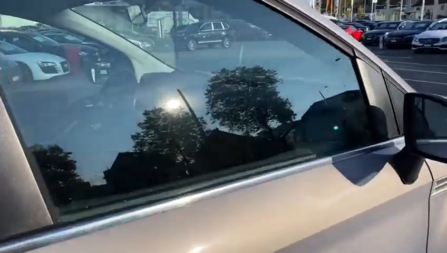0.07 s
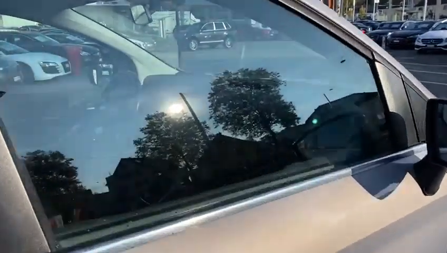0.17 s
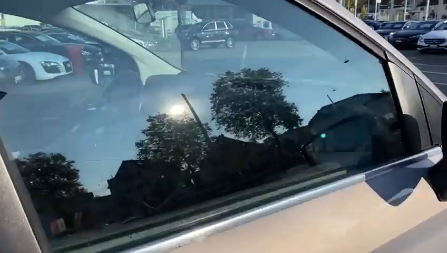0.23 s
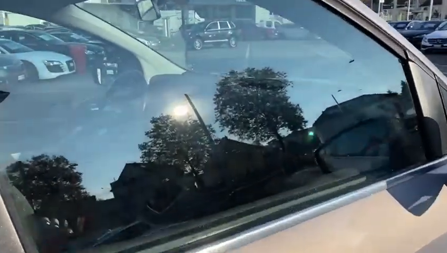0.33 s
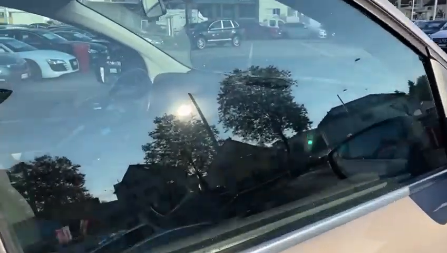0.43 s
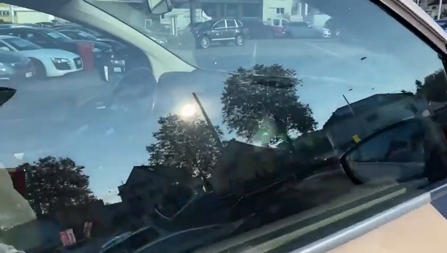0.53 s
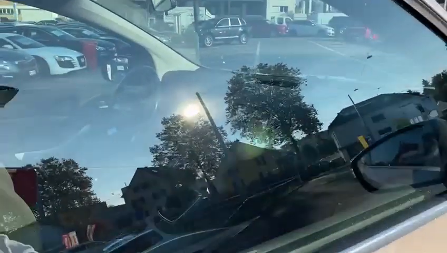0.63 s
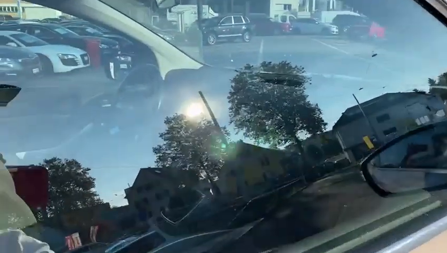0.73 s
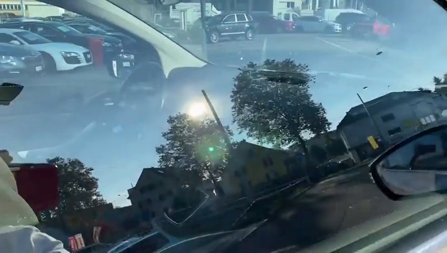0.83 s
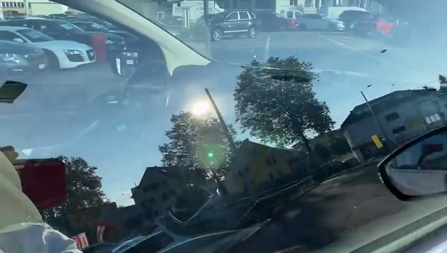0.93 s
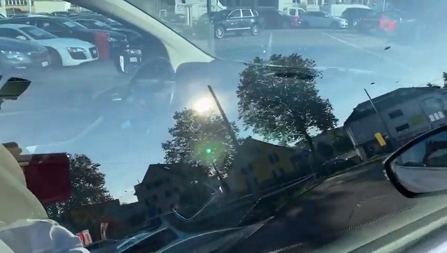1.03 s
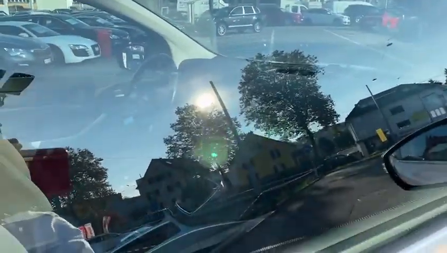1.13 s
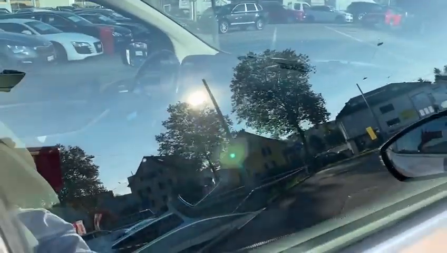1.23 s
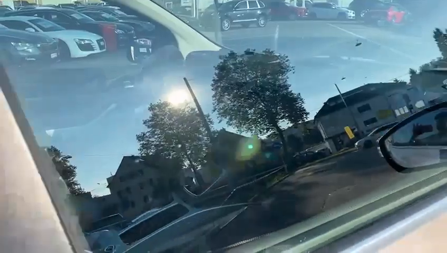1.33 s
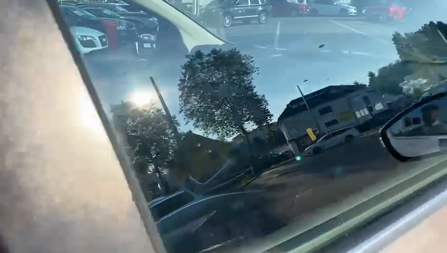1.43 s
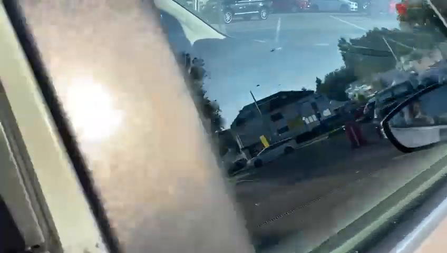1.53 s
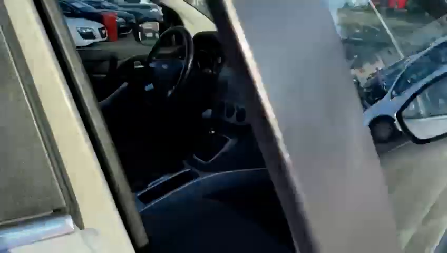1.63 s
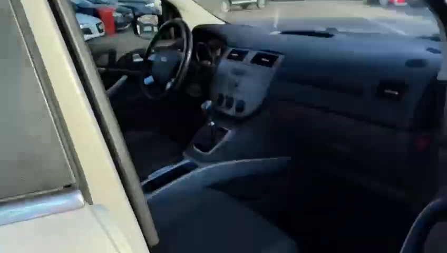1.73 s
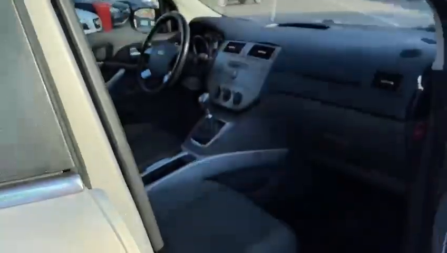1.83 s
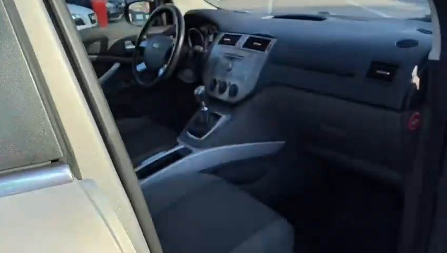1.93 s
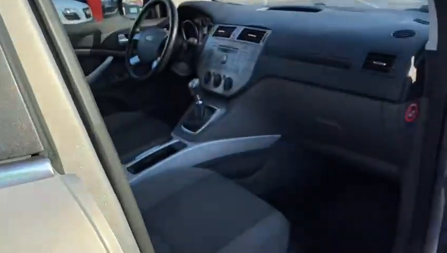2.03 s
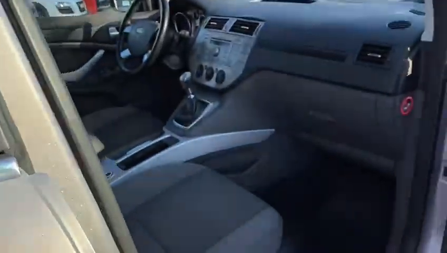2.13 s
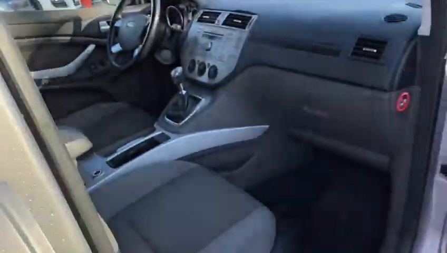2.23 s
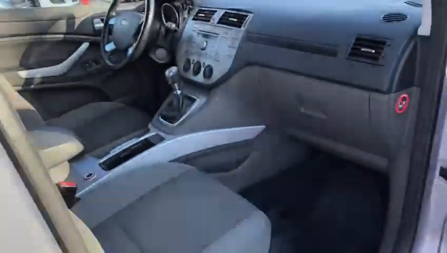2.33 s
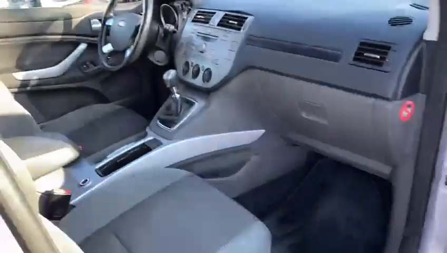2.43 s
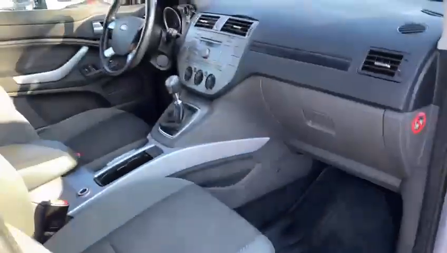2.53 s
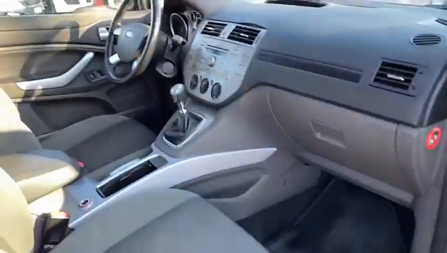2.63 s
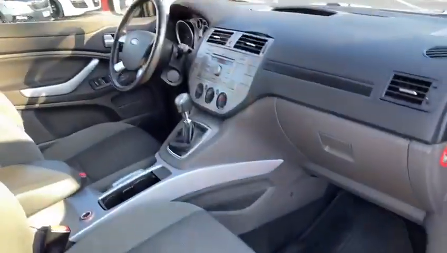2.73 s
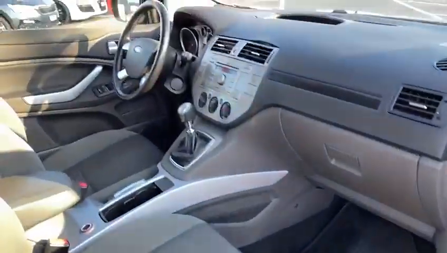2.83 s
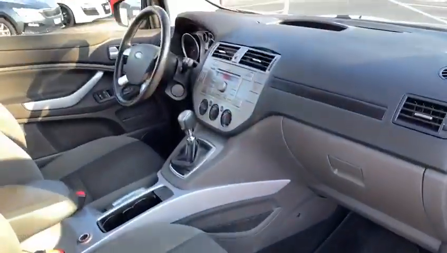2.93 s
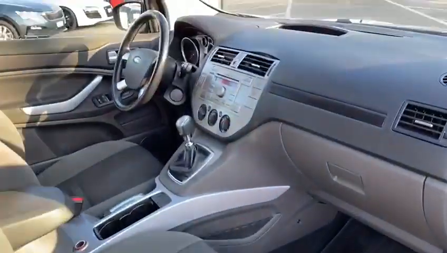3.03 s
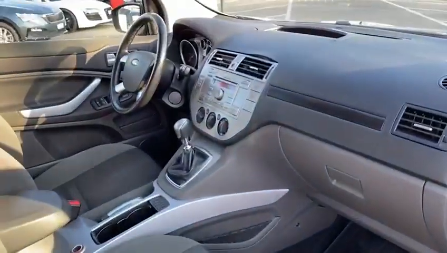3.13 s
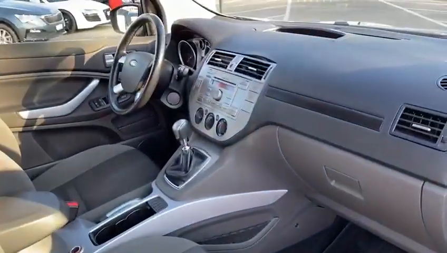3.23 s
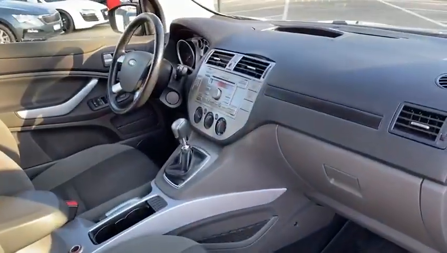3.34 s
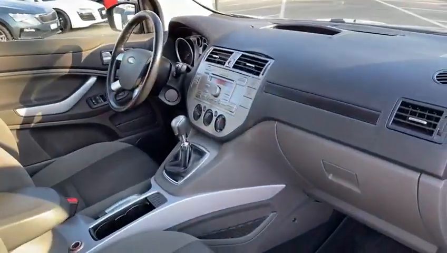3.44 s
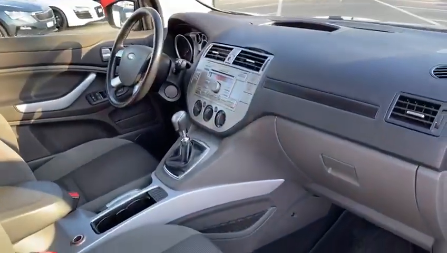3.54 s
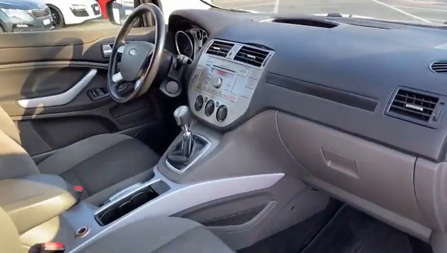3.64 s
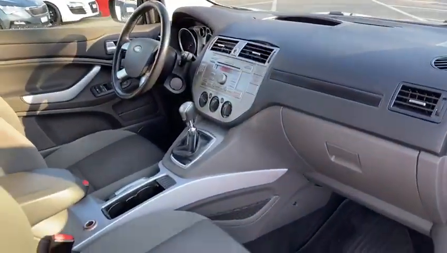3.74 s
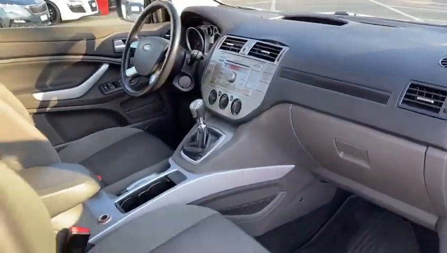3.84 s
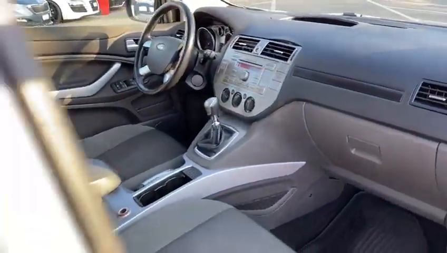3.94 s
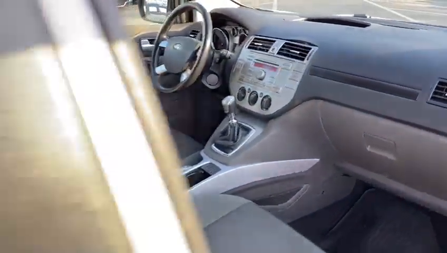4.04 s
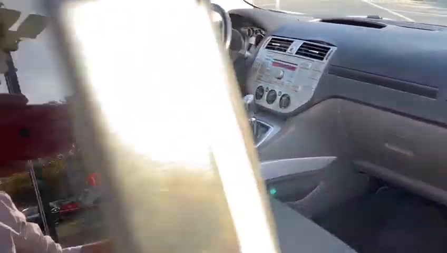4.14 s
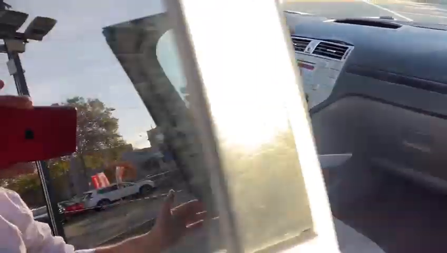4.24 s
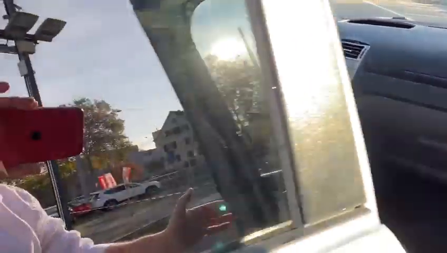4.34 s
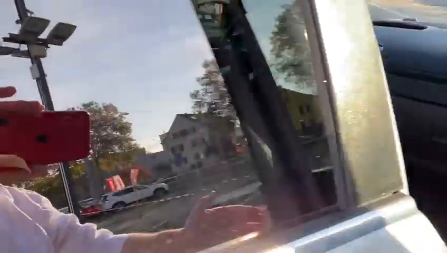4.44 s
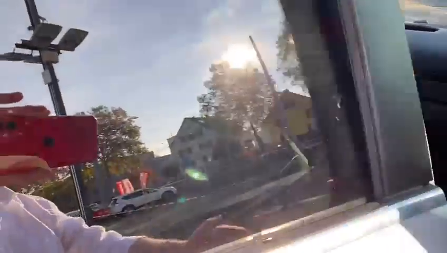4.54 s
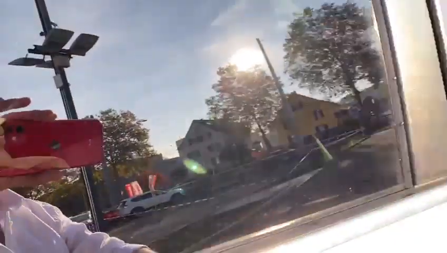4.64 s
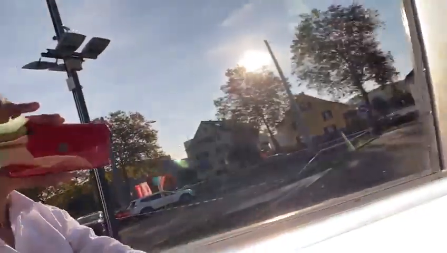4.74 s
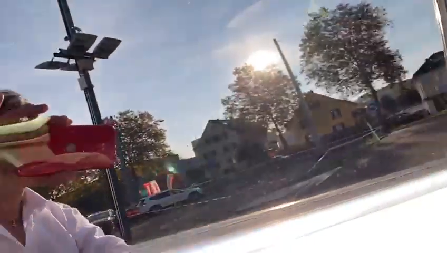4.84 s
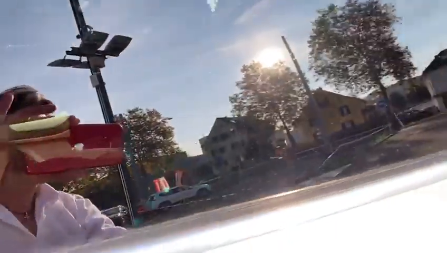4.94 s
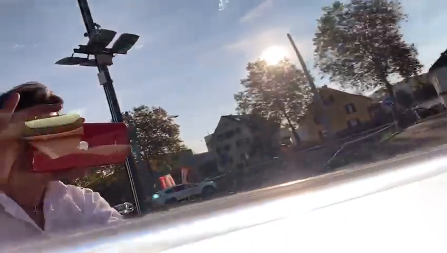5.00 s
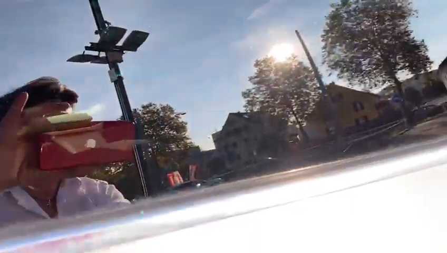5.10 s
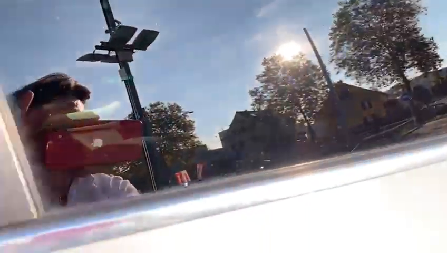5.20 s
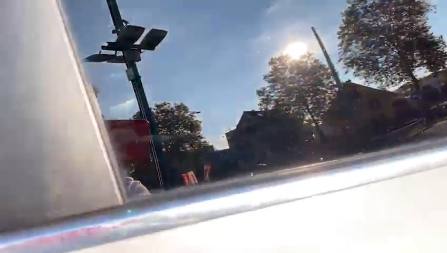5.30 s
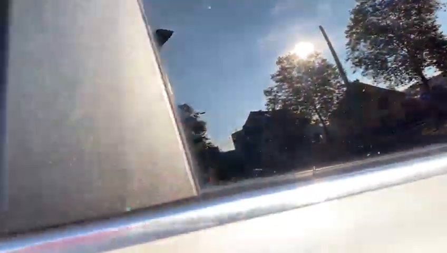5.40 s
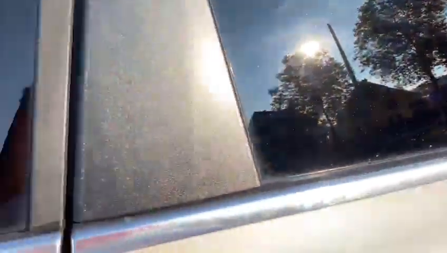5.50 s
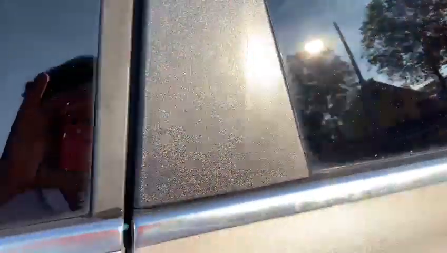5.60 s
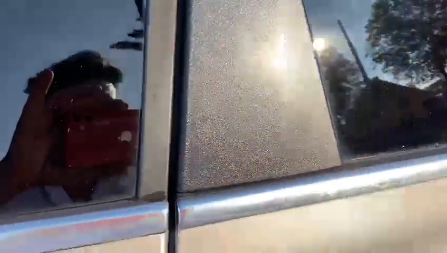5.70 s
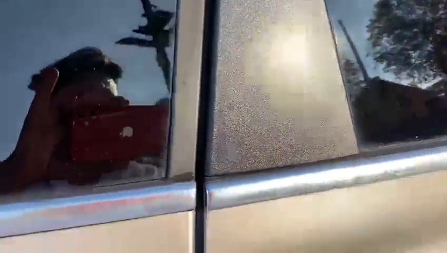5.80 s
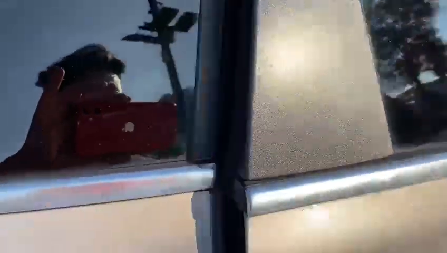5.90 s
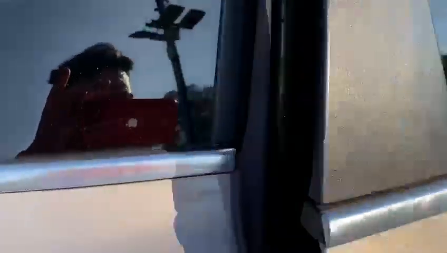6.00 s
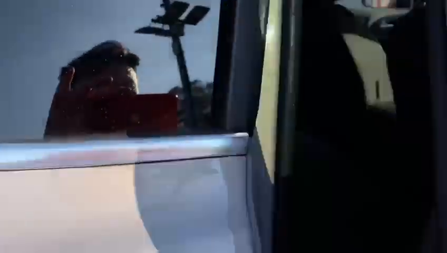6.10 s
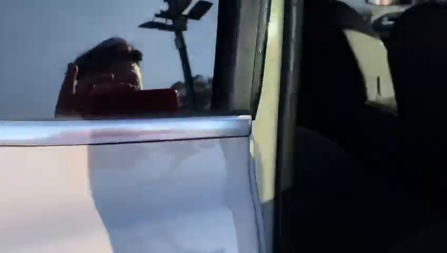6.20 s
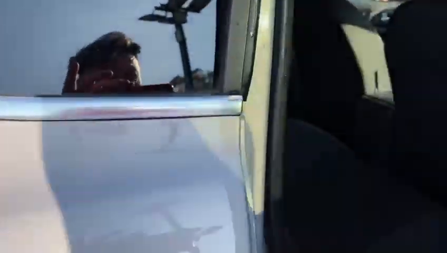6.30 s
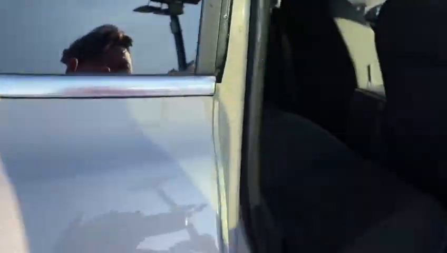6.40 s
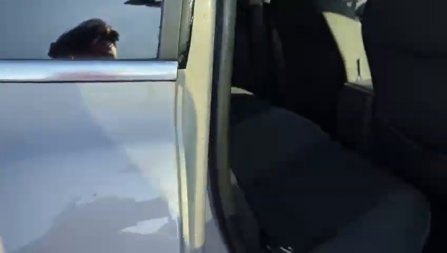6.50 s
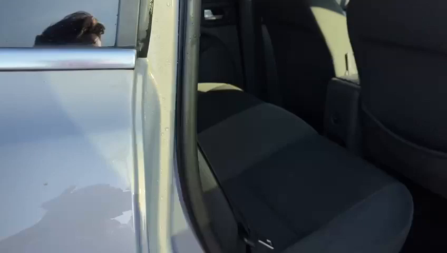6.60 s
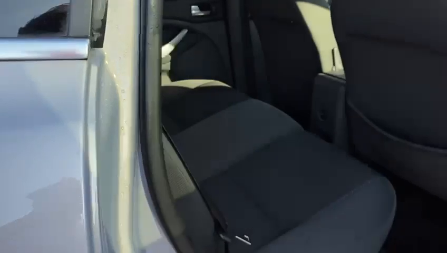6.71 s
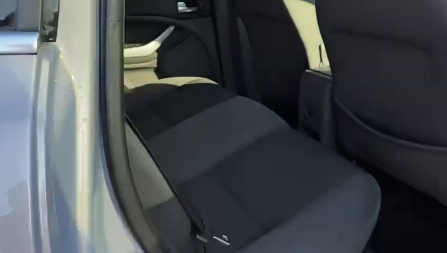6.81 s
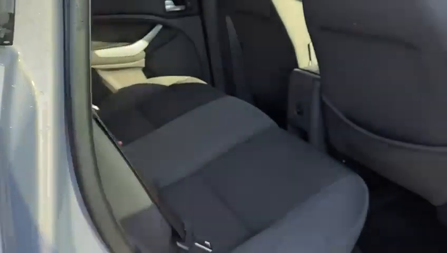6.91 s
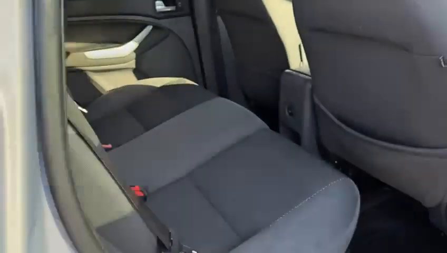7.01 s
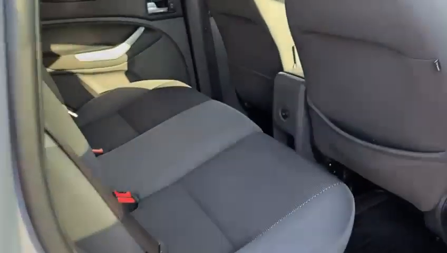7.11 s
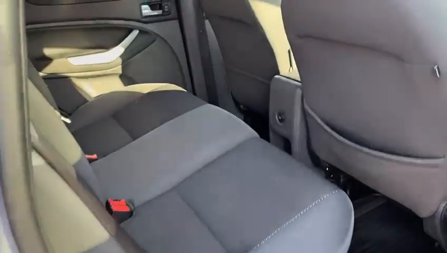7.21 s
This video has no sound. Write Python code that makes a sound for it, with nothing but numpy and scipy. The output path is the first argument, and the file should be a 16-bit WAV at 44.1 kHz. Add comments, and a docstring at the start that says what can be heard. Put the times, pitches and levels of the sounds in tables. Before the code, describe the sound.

A car's front door clicks open and slams with a hollow boom, then the rear door unlatches, over a distant engine rumble and traffic.

```python
"""A car park, close beside a car, on the stereo microphone of a hand-held camera. An engine rumbles
and traffic washes in the distance throughout. First, handle and latch knock on the hollow front door
and its hinge sings faintly. Steps thump, clothes rustle and tick, far cars swell and fade. At 4.6 s
the door slams, bounces on its rubber and makes the cabin boom. Last, from 5.7 s, the rear door opens."""
import sys
import numpy as np
from scipy import signal
from scipy.fft import rfft, irfft, next_fast_len
from scipy.io import wavfile
from scipy.ndimage import uniform_filter1d, map_coordinates

SR = 44100
rng = np.random.default_rng(int(sys.argv[2]) if len(sys.argv) > 2 else 0)


def waveform_to_disk(signal):
    """Save audio, clipped to [-1, 1], as 16-bit WAV at the path in sys.argv[1]."""
    frames = np.transpose(np.atleast_2d(signal))
    scaled = np.clip(frames, -1, 1) * 32767
    samples = np.round(scaled).astype(np.int16)
    wavfile.write(sys.argv[1], SR, samples)


N = 319989

# Resonances of each struck part. Each row: pitch in Hz, width in Hz, dB over the plain contact.
FRONT_HANDLE = [(125.9, 120, 4), (229.2, 28, 9.5), (627, 56, 8), (1850, 130, 3), (4900, 410, 3)]
FRONT_LATCH = [(136, 10, -5), (235, 47, -1.5), (445, 6.8, 11.5), (566, 14, 7), (785, 17, 9),
               (945.5, 28, 15.5), (1374, 74, 9), (1956, 90, 15.5), (3940, 130, -24), (7100, 48, 5)]
FRONT_FRAME = [(131.8, 16, 6), (186, 27, 5.2), (228, 83, 8.2), (367, 10, 5), (489.6, 20, 10.4),
               (566, 16, 14), (650, 81, 9.9), (910, 16, 2.3), (923, 16, 2.7), (1046, 17, 5.6),
               (1156, 47, 6.8), (1247, 14, 10), (1425, 45, 20), (1563, 180, 21), (1930, 96, 19),
               (2760, 120, 15), (2870, 75, 18), (3214, 140, 8), (3570, 89, 11), (3940, 440, 13),
               (4530, 100, 8), (4950, 50, 16), (5350, 90, 14), (7070, 440, 4.6), (7670, 280, 5)]
REAR_HANDLE = [(141.6, 126, 15.4), (238, 18, 11.5), (368, 9, 8.3), (434, 42, 8.5), (491, 22, 11),
               (650, 69, 11), (798, 58, 13), (1025, 18, 5.2), (1137, 120, 11), (1520, 92, 20.4),
               (1640, 130, 15), (1870, 110, 11), (2100, 110, 9), (4130, 40, 1), (7140, 390, 6)]
REAR_LATCH = [(207, 42, 12), (237, 26, 12.4), (300, 20, 5.8), (507.5, 77, 6.1), (617, 89, 7), (868, 11, 1),
              (1160, 41, 5.1), (1409, 92, 17), (2390, 120, 6.1), (2910, 190, 14), (3220, 60, 11),
              (3400, 75, 8.6)]
# The part being struck. Each row: start in seconds, resonances, boom in dB against the push,
# lead of the right microphone port in ms, leftward lean of the treble in dB.
PARTS = [(0, FRONT_LATCH, 4.5, -0.015, 0), (0.6, FRONT_HANDLE, 2, -0.26, 2.5),
         (1.5, FRONT_LATCH, -7.5, 0.4, 1), (4.4, FRONT_FRAME, 3.5, 0.22, 1),
         (5.5, REAR_HANDLE, 2, -0.24, 1.5), (6.2, REAR_LATCH, -1, 0.43, 0.5)]
# The door's registers: boom, push, knock, metal edge, snap. Each row: low and high limit in Hz,
# base t60 in seconds, after-ring in dB, its t60 in seconds.
REGISTERS = [(73, 176, 0.083, -10.5, 0.25), (157.5, 400, 0.18, -12.5, 0.31),
             (419, 1016, 0.073, -11.5, 0.17), (1165, 2300, 0.062, -2.5, 0.091),
             (2870, 19000, 0.11, -24, 0.38)]
# Handle, latch and seal strike the door. Each row: start in seconds, levels of push, knock,
# metal edge and snap in dB, rise in ms, factor on the base t60.
BLOWS = [(0.417, -42, -40.5, -46.5, -53.5, 0.96, 0.93), (0.679, -47, -48.5, -57, -59, 0.49, .3),
         (0.6845, -44.5, -42.5, -57, -54, 0.089, 0.26), (1.075, -31.5, -40.5, -53, -59, 3.5, 0.32),
         (1.105, -26, -36.5, -46, -57, 2.5, 0.41), (1.116, -24, -38.5, -54, -54.5, 1.6, 0.37),
         (1.864, -33, -35, -42, -47, 1.7, 0.64), (1.8765, -23, -19.5, -31, -39.5, 0.58, 0.45),
         (1.888, -22, -26.5, -59, -62, 2, 1), (1.972, -31, -49, -61, -57, 2.7, .5),
         (4.604, -26.5, -48, -40, -52, 3.6, 0.33), (4.6108, -21.5, -16.5, -19.5, -28, 0.74, 0.61),
         (4.618, -18.5, -16, -20.5, -23, 0.16, 0.16), (4.621, -14.5, -27.5, -32.5, -44, 0.51, 0.36),
         (4.6485, -14.5, -24, -30, -33, 0.5, 0.52), (4.662, -27, -26.5, -35, -45, 1.2, 0.41),
         (4.685, -30, -34, -42, -52, 0.91, 0.26), (5.756, -17, -20.5, -40, -53, 0.25, 0.66),
         (5.763, -28, -21, -30.5, -52, 0.36, 1), (5.793, -28, -41, -41.5, -54, 1.6, 0.96),
         (5.8125, -43, -32, -42, -51, 0.49, 0.5), (5.8415, -30.5, -32, -36.5, -71, 0.23, 0.97),
         (6.433, -24, -39, -43, -56, 7.8, 0.94), (6.45, -24, -23.5, -30.5, -40, 2.2, 0.43),
         (6.462, -15.5, -21.5, -35, -49, 4.5, 0.33)]
def doors(near_port_db_per_ms=9, head_start_cycles=0.35):
    """Close by, each blow is a burst of tiny contacts that leaves the hollow panels ringing."""
    out, t = np.zeros((2, N)), np.arange(2 ** 13 + 2 ** 12) / SR
    for s, push_db, knock_db, edge_db, snap_db, rise_ms, ring in BLOWS + bounces():
        since, resonances, boom_db, lead_ms, treble_left_db = [p for p in PARTS if p[0] <= s][-1]
        levels_db = [push_db + boom_db, push_db, knock_db, edge_db, snap_db]
        contacts = port_noise(len(t) + RUN_IN, lead_ms)
        panel = door_body(contacts, resonances, s - since, lead_ms)[:, RUN_IN:]
        panel *= 1 - np.exp(-t * 1000 / max(rise_ms, .1))
        # the port that hears the blow first hears its mids louder
        leans_db = [0, -near_port_db_per_ms * lead_ms / 2, treble_left_db]
        for db, (low_hz, high_hz, t60, after_db, after_t60) in zip(levels_db, REGISTERS):
            fade = np.hypot(amp(-60 * t / (t60 * ring)), amp(after_db - 60 * t / after_t60))
            sound = band(panel * fade, low_hz, high_hz)
            sound *= np.sqrt(.02 * SR / np.sum(sound ** 2, axis=1, keepdims=True))  # as 20 ms at rms 1
            left_db = np.interp(low_hz, [0, 450, 1100], leans_db)
            add(out, s - head_start_cycles / high_hz, amp(db) * lean(sound, left_db))
    return out

RUN_IN = 2 ** 11  # samples in which the resonances build up before a blow
def door_body(contacts, resonances, age_s, lead_ms, dull_hz=5700, ring_cycles=130, pure_hz=60):
    """Narrow resonances ring as tones, wide ones rattle, high ones die first; trim soaks up the top."""
    t, out = (np.arange(contacts.shape[-1]) - RUN_IN) / SR, contacts
    at_ports = age_s + t + np.array([[0], [lead_ms / 1000]])
    for hz, width, db in resonances:
        purity = 1 / (1 + (width / pure_hz) ** 2)
        tone = np.sqrt(2 * np.pi * width / SR) * np.sin(2 * np.pi * hz * at_ports)
        rattle = resonate(contacts, hz, hz / width)
        fade = np.exp(-np.maximum(t, 0) * hz / ring_cycles)
        out = out + amp(db) * fade * (np.sqrt(purity) * tone + np.sqrt(1 - purity) * rattle)
    return signal.lfilter(*signal.butter(2, dull_hz, fs=SR), out)

# The door shudders after a hard blow. Each row: first bounce in seconds, its push in dB.
SHUDDERS = [(1.142, -33), (1.926, -28.5), (4.687, -22.5), (5.794, -47), (6.492, -21)]
def bounces(gap_s=0.025, loss_db=7.5, knock_db=-31, edge_db=-56, snap_db=-46.5, rise_ms=5.1, ring=0.49):
    """The door bounces twice on its soft rubber, the second time more weakly; gives rows like BLOWS."""
    pushes = [(s + k * gap_s, db - k * loss_db) for s, db in SHUDDERS for k in range(2)]
    return [(s, db, db + knock_db, db + edge_db, db + snap_db, rise_ms, ring) for s, db in pushes]

SLAM_S = 4.622
# Modes of the shut cabin and the big panels. Each row: pitch in Hz, level in dB, t60 in seconds.
CABIN_MODES = [(55.4, -2.5, 0.46), (132.4, -6, 0.14), (374, -32, 0.13), (444, -7, 0.056)]
def cabin_boom(swell_cycles=2.2):
    """Heard from just outside: the closing seal squeezes the cabin air, whose modes swell and ring."""
    out, t = np.zeros((2, N)), np.arange(SR) / SR
    for hz, db, t60 in CABIN_MODES:
        swell = 1 - np.exp(-(t * hz / swell_cycles) ** 2)
        add(out, SLAM_S, amp(db - 60 * t / t60) * swell * np.sin(2 * np.pi * hz * t))
    return out

# Steps, a door against its latch and seal, hands on the door and the camera.
# Each row: time in seconds, knock level in dB, knock pitch in Hz, thud level in dB.
BUMPS = [(0.19, -56, 61, -26), (1.1245, -19, 200, -41), (1.153, -17, 128, -36), (1.182, -17, 121, -31),
         (1.223, -22, 140, -35), (1.238, -27, 131, -31), (2.049, -37, 65.5, -27.5), (2.192, -30, 80, -29),
         (2.519, -37, 120, -20), (4.0677, -12, 305, -45), (4.081, -26, 131, -26), (4.7035, -11, 140, -28),
         (4.818, -19.5, 110, -34), (4.882, -13.5, 203, -20.5), (4.927, -20, 260, -22),
         (4.945, -27, 68.3, -12.5), (4.9755, -28, 595, -35), (4.9783, -6.5, 310, -15),
         (4.987, -8.5, 147, -29), (4.991, -22, 403, -41), (5.003, -22, 190, -29), (5.141, -25, 194, -37),
         (5.239, -27, 227, -26.5), (5.413, -22.5, 97, -24.5), (5.442, -16.5, 100, -26),
         (5.706, -17.5, 680, -41), (5.7576, -7.5, 367, -35), (5.7634, -19, 300, -22),
         (5.774, -12, 330, -33), (6.469, -18.5, 246, -20), (6.691, -31, 174, -25)]
def bumps(knock_cycles=0.62, thud_cycles=1.3, tail_db=-24, tail_t60=0.42):
    """A soft contact nearby gives one rounded push, a few cycles of thud and a faint dull tail."""
    out, t = np.zeros((2, N)), (np.arange(2 ** 14) - 2 ** 10) / SR
    after = np.maximum(t, 0)
    for s, knock_db, knock_hz, thud_db in BUMPS:
        knock = -np.cos(2 * np.pi * knock_hz * t) * np.exp(-(t * knock_hz / knock_cycles) ** 2)
        thud_hz = 69.1 * (knock_hz / 100) ** 0.51  # a sharper knock has a higher thud
        onset = 1 - np.exp(-(np.pi * thud_hz * after) ** 2)
        thud = np.sin(2 * np.pi * thud_hz * after) * onset * np.exp(-after * thud_hz / (2 * thud_cycles))
        tail = unit(band(port_noise(len(t)), knock_hz / 2, knock_hz * 0.96))
        tail *= onset * amp(tail_db - 60 * after / tail_t60)
        add(out, s + t[0], amp(knock_db) * (knock + tail) + amp(thud_db) * thud)
    return out

# Spectrum of a small hard contact. Each row: frequency in Hz, gain in dB.
TICK_COLOUR = [(300, 5), (900, 20), (2200, 9), (4500, 0.5), (7000, -8), (9000, 2), (11000, -2.5),
               (13000, -24)]
# Keys, zip and grit. Each row: start in seconds, relative level in dB, ping in Hz.
TICKS = [(0.378, -41, 5640), (0.6847, -34.5, 4950), (1.074, -38, 5270), (1.1198, -34.5, 7200),
         (1.136, -32, 7200), (1.1434, -49, 10500), (1.975, -46, 4800), (2.397, -50, 7060),
         (2.8352, -44.5, 7000), (4.066, -36, 6600), (4.273, -41, 5460), (4.791, -37.5, 6600),
         (5.17, -50, 6400), (5.702, -38, 6300), (5.791, -49, 7400), (6.414, -48, 7000), (6.787, -44, 4500)]
def ticks(level_db=-6, rise_s=0.00029, decay_s=0.0059, tail_db=-19, tail_s=0.036, ping_db=11):
    """Hard little contacts just left of the microphone, each with a broad ping and hardly any ring."""
    out, t = np.zeros((2, N)), np.arange(2 ** 12) / SR
    fade = (1 - np.exp(-t / rise_s)) * (np.exp(-t / decay_s) + amp(tail_db) * np.exp(-t / tail_s))
    for s, db, ping_hz in TICKS:
        contact = colour(port_noise(len(t)), TICK_COLOUR)
        ping = amp(ping_db) * resonate(contact, ping_hz, q=5)
        add(out, s, amp(db + level_db) * unit(contact + ping) * fade)
    return lean(out, left_db=2)

# Soles, sleeves, handles and seals. Each row: start and end in seconds, level in dB,
# resonance in Hz, fizz and resonance in dB against the rasp, build-up in dB.
SCUFFS = [(0.376, 0.46, -48.5, 2260, -21, -20, -7), (0.391, 0.445, -44, 2780, -25, -7, -10),
          (1.039, 1.175, -47, 1730, -12, -15, -8), (1.332, 1.56, -54, 1790, -37, 0, 0),
          (1.393, 1.506, -40.5, 392, -21.5, 0, 0), (1.822, 1.878, -53, 3000, -6, -12, 6),
          (1.958, 2.227, -49, 2450, -9, -7.5, -6), (2.016, 2.203, -49, 1560, -14.5, 7, 2),
          (2.512, 2.613, -64.5, 2500, -5, -12, -11), (4.077, 4.353, -58, 1830, -12, -22, -19),
          (4.565, 4.607, -44, 1350, -15.5, 3.5, 16.5), (5.16, 5.251, -48.5, 2150, -7.5, -19, -3),
          (5.656, 5.792, -38, 764, -15, -6, -1), (6.4, 6.455, -52.5, 1840, -2.5, -13, 21),
          (6.68, 6.827, -54.5, 2320, -17, -1, -4)]
def scuffs(grain_db=2.0, size=2 ** 14):
    """Sliding contact at close range: clumps of tiny slips rasp, with a soft resonance and fizz above."""
    out = np.zeros((2, N))
    for start, end, db, hz, fizz_db, ring_db, build_db in SCUFFS:
        slips = port_noise(size)
        clumps = unit(uniform_filter1d(rng.standard_normal(size), size=90))
        slips *= amp(grain_db * clumps)
        rasp = unit(band(slips, hz / 14, hz * 1.24, order=2))
        ring = amp(ring_db) * unit(resonate(rasp, hz, q=7))
        fizz = amp(fizz_db) * unit(band(slips, 2300, 7600, order=2))
        length = int((end - start) * SR)
        swell = amp(db + build_db * np.linspace(-.5, .5, length)) * signal.windows.tukey(length, .5)
        add(out, start, swell * unit(rasp + ring + fizz)[:, :length])
    return lean(out, left_db=1)

# Hinge and door stay sing faintly. Each row: start and end in seconds, pitch in Hz, level in dB.
HINGE_RUBS = [(1.2, 1.524, 4180, -68), (1.301, 1.52, 1230, -60), (1.282, 1.553, 895, -54.5),
              (1.997, 2.204, 346, -49.5), (2.03, 2.174, 2800, -61), (5.858, 6.35, 258, -47.5),
              (5.88, 6.248, 842, -61), (5.897, 6.3, 1930, -65)]
def hinges(width_ratio=1.005, sag=0.0184):
    """A rubbing joint nearby sings an unsteady narrow note that sags as the door slows."""
    out = np.zeros((2, N))
    for start, end, hz, db in HINGE_RUBS:
        length = int((end - start) * SR)
        note = band(port_noise(2 ** 16), hz / width_ratio, hz * width_ratio, order=2)
        position = 2 ** 13 + np.cumsum(1 + sag * np.linspace(.5, -.5, length))
        sagging = unit(np.array([map_coordinates(port, [position]) for port in note]))
        add(out, start, amp(db) * sagging * signal.windows.tukey(length, .5))
    return lean(out, left_db=-0.5)

# Far cars. Each row: time when nearest in seconds, half length in seconds, level in dB, pitch in Hz.
PASSES = [(3.25, 0.4, -53.5, 880), (4.144, 0.84, -56.5, 888), (5.991, 0.27, -47.5, 705)]
def passing_cars(width_ratio=1.1, lead_ms=0.41):
    """Far from the microphone, each car's tyre roar swells and fades in a narrow band."""
    out, t = np.zeros((2, N)), (np.arange(2 ** 17) - 2 ** 16) / SR
    for s, half_s, db, hz in PASSES:
        roar = unit(band(port_noise(len(t), lead_ms), hz / width_ratio, hz * width_ratio, order=2))
        add(out, s + t[0], amp(db) * np.exp(-(t / half_s) ** 2) * roar)
    return out

# Spectra of engine rumble and drone, far traffic, its tyres, and clothes close by.
# Each row: frequency in Hz, relative level in dB.
RUMBLE = [(18, -9.5), (30, 3), (42, 20.5), (54, 25), (66, -16.5), (85, -8.5), (140, -53.5)]
DRONE = [(48, -14.5), (62, -1.5), (78, 4), (100, -5.5), (125, -4), (160, -8), (210, -13.5), (300, -29),
         (500, -85.5)]
TRAFFIC = [(120, -14.5), (240, 7.5), (310, 5.5), (410, 3), (560, 1.5), (750, -1), (1200, -35.5),
           (3000, -75.5)]
TYRES = [(350, -45.5), (640, -3), (850, 2), (1100, -2), (1800, -6), (2700, -14), (3400, -25), (4500, -25.5),
         (6000, -36), (8000, -56), (12000, -82)]
RUSTLE = [(1000, -21.5), (2500, -1), (4400, -2), (5600, -7), (7500, -7), (9000, -16), (11000, -21),
          (13000, -23.5)]
# The street at the microphone, shielded at times by the car.
# Each row: time in seconds, relative level in dB.
STREET_LEVEL = [(0.0, -48.5), (0.62, -49), (1.25, -46), (1.66, -49), (2.04, -50.5), (2.18, -54),
                (2.52, -54), (4.83, -48.5), (5.25, -49.5), (5.83, -46.5), (6.86, -53.5), (7.25, -55.5)]
# Clothes rustle as the person moves. Each row: start and end in seconds, level in dB.
MOVES = [(0, 1.106, -69.5), (1.08, 1.644, -67), (2.247, 2.644, -71), (4.068, 6.206, -67),
         (6.43, 6.924, -65.5)]
def background(rumble_db=-41, drone_db=-38, traffic_db=3, tyres_db=0.5, still_db=-77.5,
               linger_db=-25, linger_t60=3.65, move_fade_s=0.36):
    """The car park's bed: an engine, far traffic with its tyre roar, and the fine rustle of clothes."""
    t, out = np.arange(N) / SR, np.zeros((2, N))
    knots = np.linspace(0, t[-1], 2 ** 7)
    street_db = np.interp(t, *np.transpose(STREET_LEVEL))
    swing_db = street_db - street_db.mean()  # bass bends round the car and follows only a share of this
    slam_drone = amp(linger_db - 60 * abs(t - SLAM_S) / linger_t60) * (t > SLAM_S)
    moving = sum(amp(db) * np.clip(.5 + np.minimum(t - start, end - t) / move_fade_s, 0, 1)
                 for start, end, db in MOVES)
    layers = [(RUMBLE, amp(rumble_db + 0.14 * swing_db), .8),
              (DRONE, np.hypot(amp(drone_db + 0.51 * swing_db), slam_drone), .45),
              (TRAFFIC, amp(traffic_db + street_db), .45),
              (TYRES, amp(tyres_db + street_db), .38),
              (RUSTLE, np.hypot(moving, amp(still_db)), 0)]
    for spectrum, gain, lead_ms in layers:
        waver_db = np.interp(t, knots, rng.standard_normal(len(knots)))
        noise = unit(colour(port_noise(next_fast_len(N), lead_ms), spectrum))[:, :N]
        out += noise * gain * amp(waver_db)
    return out

# How alike the microphone's two ports hear. Each row: frequency in Hz, coherence from 0 to 1.
COHERENCE = [(60, 0.96), (150, 0.96), (320, 0.31), (650, 0.73), (1300, 0.25), (2500, 0.55), (5000, 0.59),
             (9000, 1)]
def port_noise(size, lead_ms=0, merge_hz=3100):
    """White noise at both ports: partly alike, the right ahead by lead_ms, in step in the treble."""
    left, other = rfft(rng.standard_normal((2, size)))
    hz = np.fft.rfftfreq(size, 1 / SR)
    alike = read(COHERENCE, hz)
    whole_cycles = np.round(merge_hz * lead_ms / 1000)
    lead_cycles = whole_cycles + (hz * lead_ms / 1000 - whole_cycles) / (1 + (hz / merge_hz) ** 8)
    right = (alike * left + np.sqrt(1 - alike ** 2) * other) * np.exp(2j * np.pi * lead_cycles)
    return irfft(np.array([left, right]), size)

def amp(db):
    """Decibels to gain."""
    return 10 ** (np.asarray(db) / 20)

def unit(x):
    """Scales to rms 1."""
    return x / np.sqrt(np.mean(x ** 2) + 1e-20)

def lean(x, left_db):
    """Raises the left port and lowers the right."""
    return x * amp([[left_db], [-left_db]])

def read(points, hz):
    """Reads a curve on a log-frequency axis."""
    f, value = np.transpose(points)
    return np.interp(np.log(hz + 1), np.log(f + 1), value)

def add(mix, s, sound):
    """Adds a sound to the mix at s seconds."""
    part = mix[:, max(round(s * SR), 0):][:, :sound.shape[-1]]
    part += sound[..., :part.shape[1]]

def colour(x, points):
    """Gives x a spectrum."""
    size = next_fast_len(x.shape[-1])
    gain = amp(read(points, np.fft.rfftfreq(size, 1 / SR)))
    return irfft(rfft(x, size) * gain, size)[..., :x.shape[-1]]

def band(x, low_hz, high_hz, order=4):
    """Causal band-pass: low bands swell more slowly than high ones."""
    return signal.sosfilt(signal.butter(order, [low_hz, high_hz], "band", fs=SR, output="sos"), x)

def resonate(x, hz, q):
    """Passes x through one resonance."""
    return signal.lfilter(*signal.iirpeak(hz, q, SR), x)

# Where the street sits at the microphone. Each row: frequency in Hz, leftward lean in dB.
STREET_SIDE = [(300, 0), (560, -1.5), (850, 0), (1200, 0), (1700, 0.24), (3200, 0.5), (5000, 0.1),
               (7000, 0)]
def scene():
    """The car and the person close up, the street behind them."""
    left, right = background() + passing_cars()
    right_side = [(hz, -db) for hz, db in STREET_SIDE]
    street = np.array([colour(left, STREET_SIDE), colour(right, right_side)])
    return doors() + cabin_boom() + bumps() + ticks() + scuffs() + hinges() + street

# Phase between the ports. Each row: frequency in Hz, lag of the left port in cycles.
PORT_LAG = [(7000, 0), (7700, .12), (8300, .4), (9000, .5), (9700, .59), (10400, .9), (11200, 1)]
# The microphone's treble response. Each row: frequency in Hz, gain in dB.
MICROPHONE = [(7000, 0), (8000, 0.5), (9100, 1.5), (10200, 2.5), (11200, 4.5), (12000, -4.5)]
def record(dry, top_hz=12000):
    """The hand-held microphone: its ports drift out of step up high, peaks round off, the top is cut."""
    size = next_fast_len(N + 2 ** 10)
    lag_cycles = read(PORT_LAG, np.fft.rfftfreq(size, 1 / SR)) * np.array([[1], [0]])
    at_ports = irfft(rfft(dry, size) * np.exp(-2j * np.pi * lag_cycles), size)[:, :N]
    heard = colour(at_ports, MICROPHONE)
    rounded = heard / (1 + heard ** 6) ** (1 / 6)
    low_pass = signal.firwin(255, top_hz, window=("kaiser", 9), fs=SR)
    return signal.oaconvolve(rounded, low_pass[None], "same")

dry = scene()
out = record(dry)
waveform_to_disk(out)
```